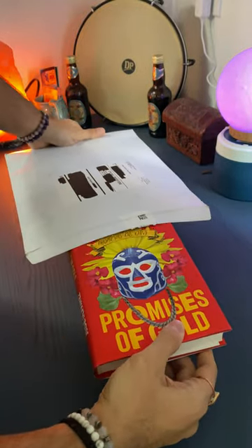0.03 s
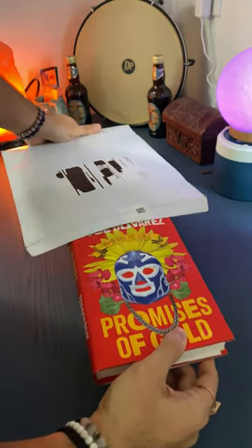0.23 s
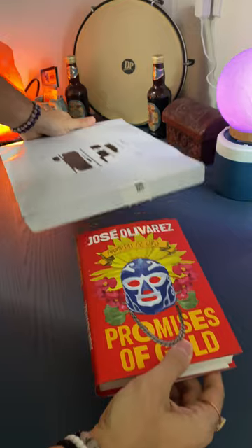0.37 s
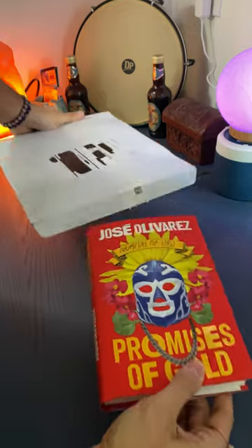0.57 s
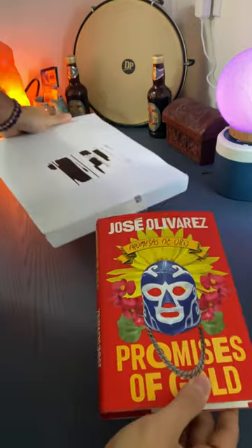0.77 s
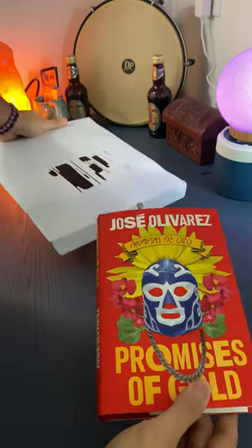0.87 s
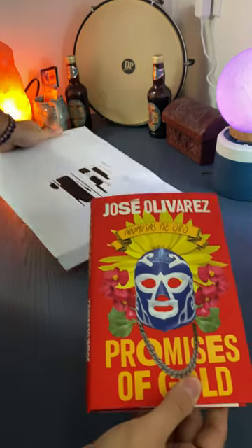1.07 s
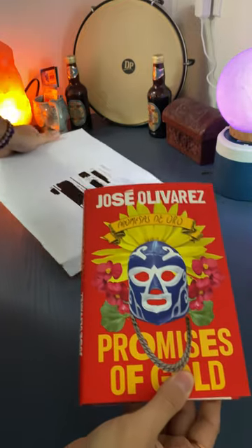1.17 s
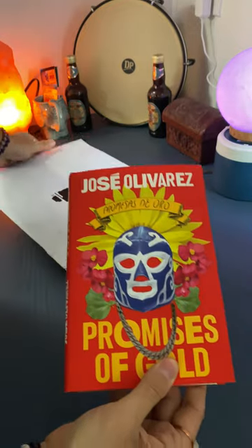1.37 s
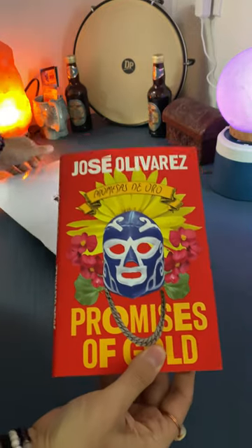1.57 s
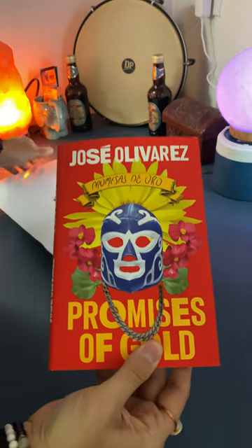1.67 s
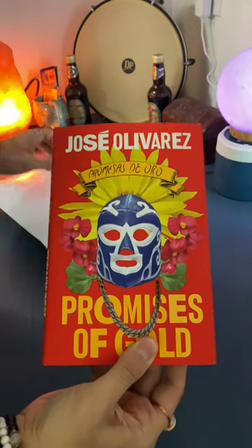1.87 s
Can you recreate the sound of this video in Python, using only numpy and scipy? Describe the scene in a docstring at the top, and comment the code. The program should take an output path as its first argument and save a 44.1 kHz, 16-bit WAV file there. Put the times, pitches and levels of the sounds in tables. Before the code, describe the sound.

Card rustles and claps as a book is pulled out, then knocks and scrapes a table.

```python
"""A book leaves its card sleeve

A hardback is pulled out of its sleeve over a table in a quiet, humming room. The card rubs
along the cover with a hiss and claps shut as the book comes free. The sleeve is knocked down
on the table and pushed aside, and its hollow walls ring briefly at the blows.
A fingertip squeaks as it lets go, and the loose card wobbles."""
import sys
import numpy as np
from scipy import signal
from scipy.fft import rfft, irfft
from scipy.io import wavfile
from scipy.ndimage import uniform_filter1d

SR = 44100
rng = np.random.default_rng(int(sys.argv[2]) if len(sys.argv) > 2 else 0)


def waveform_to_disk(signal):
    """Save audio, clipped to [-1, 1], as 16-bit WAV at the path in sys.argv[1]."""
    frames = np.transpose(np.atleast_2d(signal))
    scaled = np.clip(frames, -1, 1) * 32767
    samples = np.round(scaled).astype(np.int16)
    wavfile.write(sys.argv[1], SR, samples)


N = 83790
TIME = np.arange(N) / SR

# Card rubbing on the book's cover: t/s, level/dB
HISS_LEVEL = [(0, -58.5), (.1, -60.5), (.178, -59), (.195, -48), (.215, -50.5), (.231, -39), (.245, -57.5),
              (.275, -47), (.3, -54), (.326, -41.5), (.345, -96), (.37, -87), (.43, -82)]
# Its tone, meaning how strong the low and high pitches are next to each other: f/Hz, level/dB
HISS_TONE = [(100, -24), (500, 10), (1000, 2.5), (1600, -1), (2300, 1), (2850, 3), (3300, -3.5), (6000, -5),
             (7300, -24.5), (9000, -8.5), (12500, -11.5), (15500, -9)]
# The sleeve shuddering as the book's edge drags through its mouth: t/s, level/dB
SHUDDER_LEVEL = [(.17, -70), (.2, -41), (.222, -55), (.232, -28.5), (.255, -40), (.275, -61), (.29, -65)]
# Deep tone of the shudder: f/Hz, level/dB
SHUDDER_TONE = [(30, -23), (62, 5.5), (100, -0.5), (170, 1.5), (300, -18.5), (460, 3), (570, -6.5),
                (680, -10.5), (860, -19), (980, -8.5), (1200, -16), (3000, -70)]
# The sleeve clapping shut: t/s, level/dB, time the walls keep buckling/s
WALL_CLAPS = [(.285, -0.5, 0.0027), (0.2883, 0, 0.0023), (0.2929, -0.5, 0.0022), (.308, -13.5, 0.0035)]
# Tone of the clap: f/Hz, level/dB
CLAP_TONE = [(40, -35), (130, 4.5), (260, -3.5), (500, 8.5), (830, 0.5), (1000, -3.5), (1300, -3.5),
             (1900, -7.5), (2700, -10), (3600, -33), (6000, -30.5), (15000, -36)]
# The sleeve hitting the table: t/s, level/dB
TABLE_KNOCKS = [(1.1245, -1.5), (1.186, -16.5)]
# Tone of a knock: f/Hz, level/dB
KNOCK_TONE = [(40, -24), (90, 6.5), (250, -12.5), (500, 1.5), (700, -2.5), (830, -2), (990, 7.5), (1250, 2),
              (1750, 1), (2200, -10.5), (3000, -14), (3800, -32.5), (6500, -35.5), (15000, -67)]
# Blows that set the walls ringing: t/s, level/dB
RING_BLOWS = [(0.2868, 1.5), (1.127, -12.5), (1.187, -18.5), (1.301, -17.5)]
# Notes the walls ring at: f/Hz, level/dB, time to fade by 60 dB/s (capped in wall_ring)
WALL_NOTES = [(65.6, -45, 0.19), (125, -36.5, 0.26), (162, -32, 0.16), (199.2, -40, 0.24), (246, -39, 0.37),
              (383.4, -42, 0.18), (451, -32, 0.15), (486, -25, 0.073), (536, -26.5, 0.14), (657, -21, 0.13),
              (792, -27.5, 0.057), (971, -33, 0.077), (1374, -30, 0.045), (1921, -37, 0.057),
              (2460, -41, .09), (2794, -41.5, .09)]
# Paper edges snapping: t/s, level/dB, fade time/s
EDGE_SNAPS = [(0.229, -25, 0.0032), (0.2835, -14, 0.0029), (0.322, -28, 0.0065), (1.129, -41, 0.024),
              (1.188, -41, 0.0063), (1.299, -39, 0.0023), (1.343, -36, 0.0059), (1.507, -43, 0.0036),
              (1.598, -30.5, 0.017)]
# Bright tone of a snap: f/Hz, level/dB
SNAP_TONE = [(300, 6.5), (1500, 6), (3500, 9.5), (5800, 14), (7200, -12), (9000, 4.5), (11500, 6),
             (15500, -3.5)]
# Ticks of the glossy dust jacket: t/s, level/dB
JACKET_TICKS = [(0.2841, -13.5), (.5535, -48)]
# Very bright tone of a tick: f/Hz, level/dB
TICK_TONE = [(1000, -40), (7000, -22), (8500, 4), (10200, 0.5), (12000, -9.5), (15500, -20)]
# The sleeve sliding over the table: t/s, level/dB
SCRAPE_LEVEL = [(1.19, -58), (1.24, -67), (1.265, -55.5), (1.29, -70), (1.305, -52), (1.325, -56.5),
                (1.36, -42.5), (1.385, -42), (1.42, -43.5), (1.452, -43), (1.475, -68), (1.5, -96)]
# Tone of the scrape at full speed: f/Hz, level/dB
FAST_TONE = [(100, -7), (250, -12.5), (550, 3.5), (800, -2), (980, 5), (1300, -2.5), (1800, -6),
             (3300, -18), (4500, -17.5), (7000, -38), (9500, -29.5), (15000, -31)]
# Its duller tone as the sleeve slows: f/Hz, level/dB
SLOW_TONE = [(100, -16), (250, -15), (600, 9), (900, -2), (1400, -0.5), (2200, -20), (3500, -30),
             (7000, -38), (15000, -62)]
# The hand brushing off the card: t/s, level/dB, half length/s
HAND_BRUSHES = [(1.52, -38, 0.0084), (1.605, -47.5, 0.0074)]
# Tone of the brushing: f/Hz, level/dB
BRUSH_TONE = [(150, -18), (450, -3.5), (780, 2), (930, -1.5), (1100, -12), (1500, -4.5), (2100, -11),
              (2700, -11), (3400, -27), (4400, -19.5), (7500, -45), (15000, -37)]
# Fingertips and card squeaking: t/s, level/dB, length/s, f/Hz, pitch slide/(Hz per s)
GRIP_SQUEAKS = [(0.227, -42, 0.01, 2860, 0), (1.512, -40, .018, 921.3, -11000),
                (1.599, -30, 0.014, 968, -9)]
# Fingers tapping the card: t/s, level/dB
FINGER_TAPS = [(.402, -30.5), (.630, -36), (.666, -39.5), (.698, -44), (.844, -41), (.891, -40.5)]
# Fingers shifting between the clap and the knock: t/s, level/dB
RUB_LEVEL = [(.42, -84), (.5, -89), (.6, -99), (.64, -73), (.7, -83), (.75, -108), (.82, -81), (.89, -76.5),
             (.95, -85), (1.1, -76)]
# Tone of fingers on card: f/Hz, level/dB
FINGER_TONE = [(200, -3), (1200, 4), (2800, -3.5), (5000, -14.5), (8000, -22), (15000, -30)]
# Echoes off nearby surfaces: delay/s, level/dB
NEAR_ECHOES = [(.0032, -8.5), (.0058, -13), (.0108, -11.5), (0.0204, -16)]
# How long the room rings: f/Hz, time to fade by 60 dB/s
ROOM_FADE = [(100, 0.51), (500, 0.33), (2000, 0.29), (6000, 0.28), (15000, 0.13)]
# Tone of the ventilation: f/Hz, level/dB
AIR_TONE = [(20, -34), (35, -11), (55, -5.5), (80, -8), (140, -8.5), (200, -9), (280, -4.5), (340, -12),
            (440, -8.5), (600, -15), (1000, -30.5), (1600, -34.5), (3300, -42), (5000, -48.5),
            (8000, -56.5), (10700, -44.5), (13000, -60), (16000, -72)]
# How alike it is on the left and right: f/Hz, likeness (0 to 1)
AIR_LIKENESS = [(100, .995), (180, .97), (300, .84), (600, .55), (1100, .15), (3000, .3), (12000, .4)]
# Notes of the mains hum: f/Hz, level/dB
HUM_NOTES = [(59.2, -58), (118.4, -56), (177.6, -75.5), (238, -66), (290, -67.5), (349.9, -69),
             (425.3, -63.5), (495.3, -73.5)]
# Faint electrical whistles: f/Hz, width/Hz, level/dB
WHINE_BANDS = [(3480, 10, -95.5), (10340, 91, -90)]
# How much louder the left microphone is than the right: f/Hz, level/dB
LEFT_LOUDER = [(80, 0.53), (170, 1.2), (400, 4.5), (700, 3), (1100, 1.8), (3000, -1.1), (12000, 0.3)]
# How far the wave at the left microphone is ahead: f/Hz, phase/rad
LEFT_AHEAD = [(150, 0), (300, 0), (600, -.3), (1100, -.5), (2000, .1), (4000, .3), (6000, 1.4),
              (9500, -1.4), (14000, -2.8)]


def pull():
    """Card hisses along the cover and shudders near the end of the pull."""
    hiss = colour(friction(per_s=14000, spread_db=0.5) * level(HISS_LEVEL), HISS_TONE)
    shudder = colour(friction(per_s=2500, spread_db=2.0) * level(SHUDDER_LEVEL), SHUDDER_TONE)
    return hiss + shudder


def clap():
    """The walls of the empty sleeve slap together."""
    slaps = sum(blow(*row, grit=0.63) for row in WALL_CLAPS)
    return through_panel(colour(slaps, CLAP_TONE))


def knocks(cutoff_hz=4200):
    """The sleeve lands on the table with dull knocks."""
    hits = sum(blow(s, db, fade_s=0.0036, grit=0.66) for s, db in TABLE_KNOCKS)
    dull = signal.lfilter(*signal.butter(3, cutoff_hz, fs=SR), colour(hits, KNOCK_TONE))
    return through_panel(dull)


def wall_ring(start_s, blow_db, rise_s=0.0016, longest_s=.22):
    """The hollow sleeve rings after a blow, each note fading at its own speed."""
    t = np.maximum(TIME - start_s, 0)
    notes = sum(amp(db - 60 * t / min(fade_s, longest_s)) * np.sin(2 * np.pi * hz * t)
                for hz, db, fade_s in WALL_NOTES)
    return amp(blow_db) * notes * (1 - np.exp(-t / rise_s))


def snaps():
    """Paper edges snap with a bright crackle."""
    return colour(sum(blow(*row, grit=0.98) for row in EDGE_SNAPS), SNAP_TONE)


def ticks():
    """The dust jacket gives short, very bright ticks."""
    return colour(sum(blow(s, db, fade_s=0.0011, grit=0.77) for s, db in JACKET_TICKS), TICK_TONE)


def push(slow_from_s=1.4, slow_for_s=0.058):
    """The sleeve scrapes over the table, duller as it slows, and the hand brushes off it."""
    slips = friction(per_s=7200, spread_db=2.0) * level(SCRAPE_LEVEL)
    slow = np.clip((TIME - slow_from_s) / slow_for_s, 0, 1)
    scrape = colour(slips * (1 - slow), FAST_TONE) + colour(slips * slow, SLOW_TONE)
    touch = sum(amp(db) * np.exp(-.5 * ((TIME - s) / half_s) ** 2) for s, db, half_s in HAND_BRUSHES)
    brush = colour(friction(per_s=3500, spread_db=2.5) * touch, BRUSH_TONE)
    return through_panel(scrape + brush)


def squeak(start_s, db, length_s, hz, slide, overtone_db=-20):
    """Skin or card sticks and slips so fast that it makes a short, rough note."""
    t = np.clip(TIME - start_s, 0, length_s)
    uneven = 1 + .04 * unit(uniform_filter1d(rng.standard_normal(N), size=60))
    phase = 2 * np.pi * np.cumsum((hz + slide * t) * uneven) / SR
    overtones = sum(np.sin(k * phase) / (k - 1) for k in range(2, 7))
    swell = np.interp(t / length_s, [0, .31, .69, 1], [0, 1, .71, 0])
    return amp(db) * swell * (np.sin(phase) + amp(overtone_db) * overtones)


def wobble(start_s=1.515, db=-41, hz=76.8, drop_hz_per_s=82):
    """The loose card flaps, slowing as it dies away."""
    t = np.maximum(TIME - start_s, 0)
    swell = np.interp(t, np.cumsum([0, .022, .085, .04]), [0, 1, .6, 0])  # rise, sag, fall
    return amp(db) * swell * np.sin(2 * np.pi * t * (hz - .5 * drop_hz_per_s * t))


def fingers():
    """Fingers tap and rub faintly on the card."""
    taps = sum(blow(s, db, fade_s=0.0049, grit=0.79) for s, db in FINGER_TAPS)
    rubbing = friction(per_s=3500, spread_db=5.5) * level(RUB_LEVEL)
    return colour(taps + rubbing, FINGER_TONE)


def friction(per_s, spread_db):
    """Rubbing is a stream of tiny slips of uneven size."""
    size = amp(spread_db * np.minimum(rng.exponential(1, N), 4))
    return unit(size * rng.standard_normal(N) * (rng.random(N) < per_s / SR))


def blow(start_s, db, fade_s, grit):
    """A click, then a dying crackle of small contacts; more grit (0 to 1) means more crackle."""
    click = np.arange(N) == round(start_s * SR)
    crackle = rng.standard_normal(N) * (TIME >= start_s) * np.exp(-abs(TIME - start_s) / fade_s)
    return amp(db) * (grit * crackle / np.linalg.norm(crackle) + np.sqrt(1 - grit ** 2) * click)


def through_panel(x, delay_at_1khz_s=0.000891):
    """High pitches travel faster through a thin panel, so they arrive first."""
    hz = np.fft.rfftfreq(2 * N, 1 / SR)
    phase_lag = 4 * np.pi * delay_at_1khz_s * np.sqrt(1000 * hz)
    return irfft(rfft(x, 2 * N) * np.exp(-1j * phase_lag))[:N]


def room(x, tail_db=0, wide_above_hz=590):
    """Nearby surfaces add echoes, and the room adds a short tail of sound."""
    echoes = sum(amp(db) * np.interp(TIME - round(s * SR) / SR, TIME, x, left=0)
                 for s, db in NEAR_ECHOES)
    clutter = echo_tail([(1, .06)])  # fades in 0.06 s at every pitch
    middle, side = amp(-8.5) * (echo_tail(ROOM_FADE) + clutter)
    # Left and right share the same tail in the bass.
    side = signal.lfilter(*signal.butter(2, wide_above_hz, "high", fs=SR), side)
    response = np.array([middle + side, middle - side]) / np.sqrt(2)
    tail = signal.fftconvolve(x[None], response, axes=1)[:, :N]
    return x + echoes + amp(tail_db) * tail


def echo_tail(fade_times, rise_s=0.0022):
    """Many echoes blur into two channels of noise, each pitch fading at its own speed."""
    hz, t, bands = signal.stft(rng.standard_normal((2, SR // 2)), SR, nperseg=256)
    fade = amp(-60 * t / look_up(fade_times, hz)[:, None])
    tail = signal.istft(bands * fade, SR, nperseg=256)[1]
    tail *= np.minimum(np.arange(tail.shape[1]) / SR / rise_s, 1)
    return tail / np.linalg.norm(tail, axis=1, keepdims=True)


def ventilation(db=-56):
    """Air rushes steadily, almost the same on both sides in the bass."""
    hz = np.fft.rfftfreq(N, 1 / SR)
    middle, side = rfft(rng.standard_normal((2, N)))
    alike = look_up(AIR_LIKENESS, hz)
    pair = np.sqrt(1 + alike) * middle + np.sqrt(1 - alike) * side * [[1], [-1]]
    return amp(db) * unit(irfft(pair * amp(look_up(AIR_TONE, hz)), N))


def mains_hum(waver_s=0.00031):
    """The mains supply hums on low notes that waver slightly."""
    hum = 0
    for hz, db in HUM_NOTES:
        cycles = hz * (TIME + waver_s * drift(speed_hz=3)) + rng.random()
        hum += amp(db) * np.sqrt(2) * np.sin(2 * np.pi * cycles)
    return hum


def whine(waver_db=4):
    """Two faint electrical whistles come and go."""
    hz = np.fft.rfftfreq(N, 1 / SR)
    whistles = 0
    for pitch, width, db in WHINE_BANDS:
        band = np.exp(-.5 * ((hz - pitch) / width) ** 2)
        whistle = irfft(rfft(rng.standard_normal(N)) * band, N)
        whistles += amp(db) * unit(whistle * amp(waver_db * drift(speed_hz=10)))
    return whistles


def drift(speed_hz):
    """A slow, random wander around zero."""
    hz = np.fft.rfftfreq(N, 1 / SR)
    return unit(irfft(rfft(rng.standard_normal(N)) * np.exp(-hz / speed_hz), N))


def colour(x, tone, size=4096):
    """Gives a sound the tone in a table, using a filter that never rings ahead of the sound."""
    log_gain = np.log(amp(look_up(tone, abs(np.fft.fftfreq(size, 1 / SR)))))
    spectrum = np.exp(np.conj(signal.hilbert(log_gain)))
    response = np.fft.ifft(spectrum).real[:size // 2]
    return signal.fftconvolve(x, response / np.linalg.norm(response))[:N]


def level(points):
    """Joins (t/s, level/dB) points into a volume curve, silent outside them."""
    s, db = np.transpose(points)
    return amp(np.interp(TIME, s, db, left=-200, right=-200))


def look_up(points, hz):
    """Reads between a table's rows, with the octaves evenly spaced."""
    f, value = np.transpose(points)
    return np.interp(np.log(hz + 1), np.log(f + 1), value)


def amp(db):
    """Turns decibels into a number to multiply by."""
    return 10 ** (np.asarray(db) / 20)


def unit(x):
    """Scales a signal to an average size (rms) of 1."""
    return x / np.sqrt(np.mean(x ** 2) + 1e-20)


def scene():
    """The book, sleeve and hand sounds over the room's background."""
    card = room(pull() + clap() + knocks() + snaps() + fingers() + ticks() + push())
    squeaks = room(sum(squeak(*row) for row in GRIP_SQUEAKS), tail_db=-7.5)
    walls = sum(wall_ring(*row) for row in RING_BLOWS) + wobble()
    return amp(-1.0) * (card + squeaks) + walls + ventilation() + mains_hum() + whine()


def record(dry, lowest_hz=36, highest_hz=16000):
    """Two close microphones hear the scene; the very lowest and highest pitches are cut."""
    hz = np.fft.rfftfreq(2 * N, 1 / SR)
    side = np.array([[.5], [-.5]])
    balance = amp(side * look_up(LEFT_LOUDER, hz))
    timing = np.exp(1j * side * look_up(LEFT_AHEAD, hz))
    pair = irfft(rfft(dry, 2 * N) * balance * timing)[:, :N]
    low_cut = signal.butter(4, lowest_hz, "high", fs=SR, output="sos")
    high_cut = signal.firwin(511, highest_hz, window=("kaiser", 9), fs=SR)
    return signal.oaconvolve(signal.sosfilt(low_cut, pair), high_cut[None], "same")


dry = scene()
out = record(dry)
waveform_to_disk(out)
```